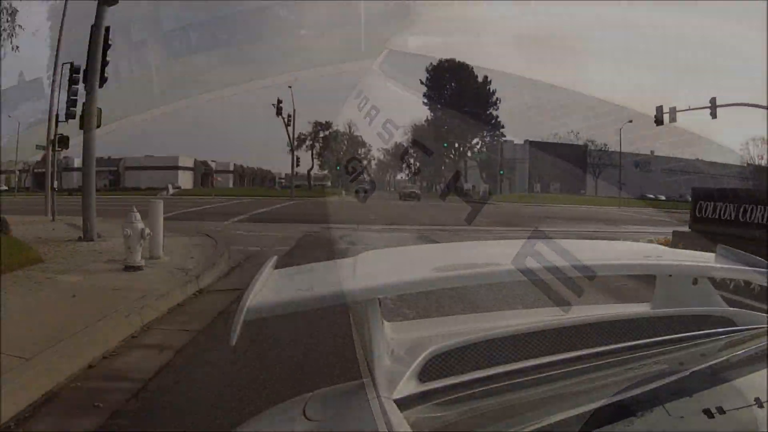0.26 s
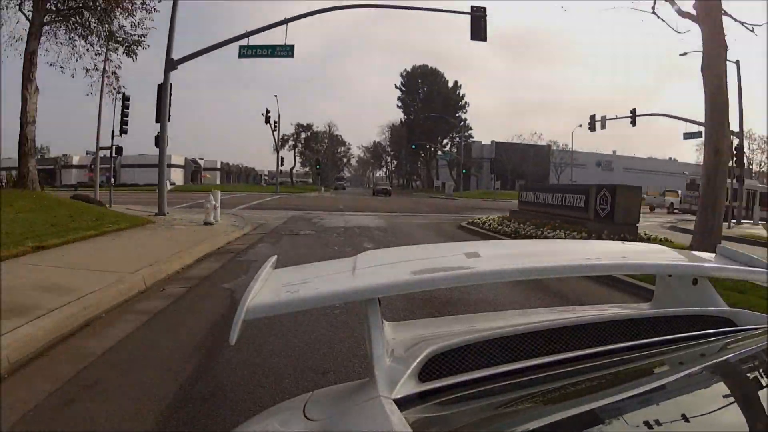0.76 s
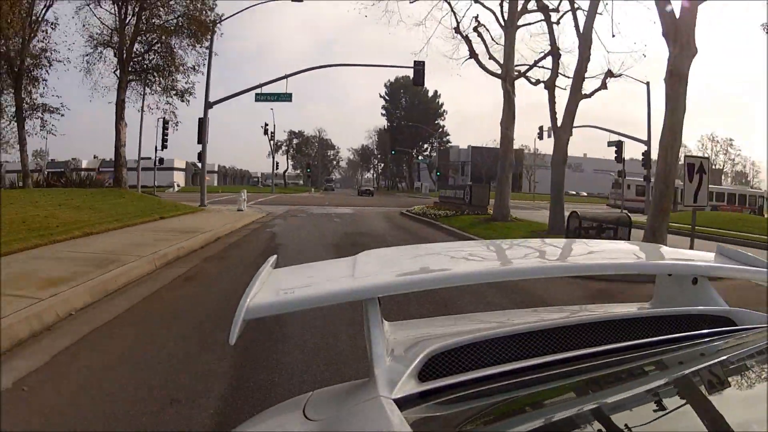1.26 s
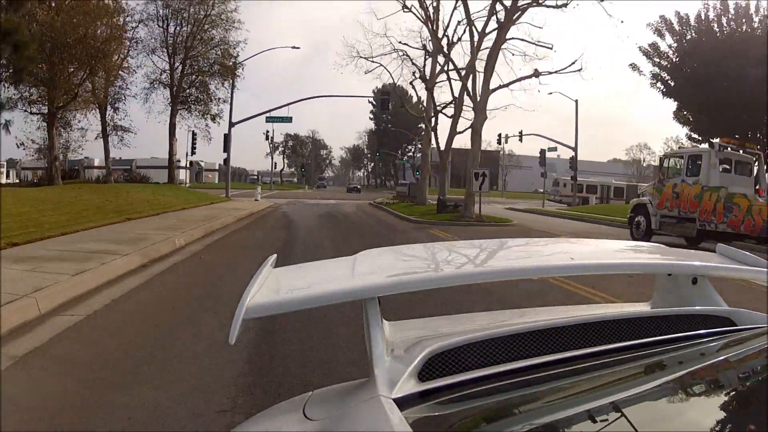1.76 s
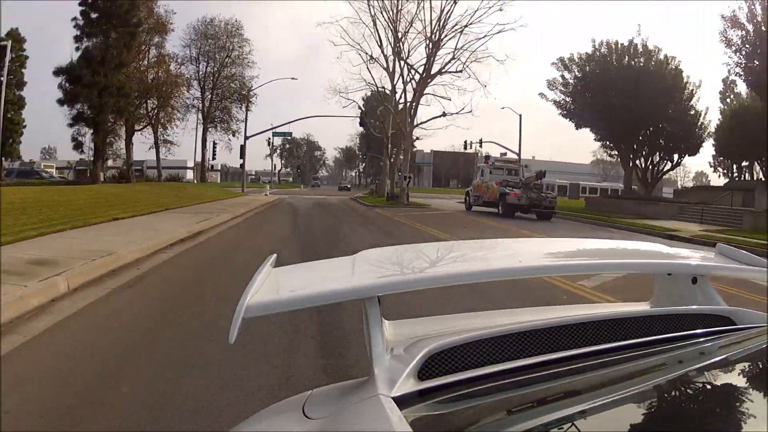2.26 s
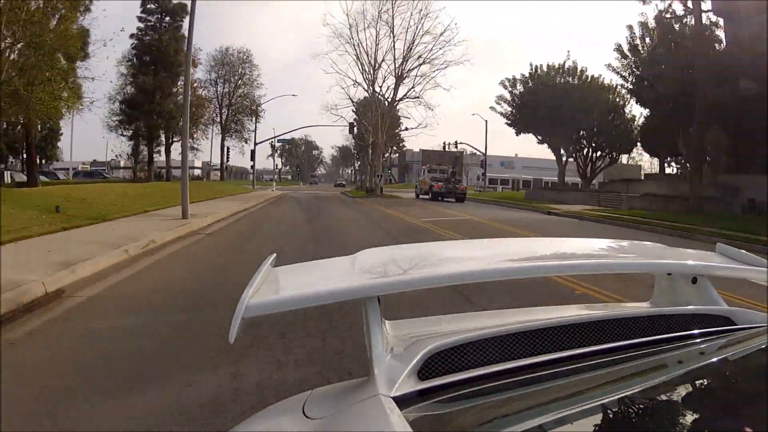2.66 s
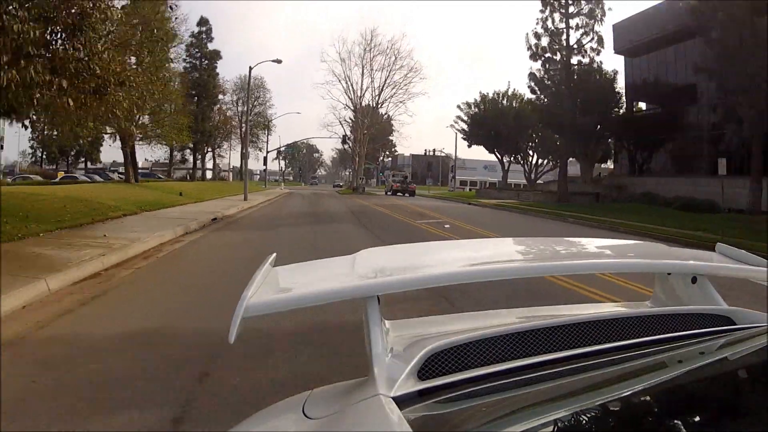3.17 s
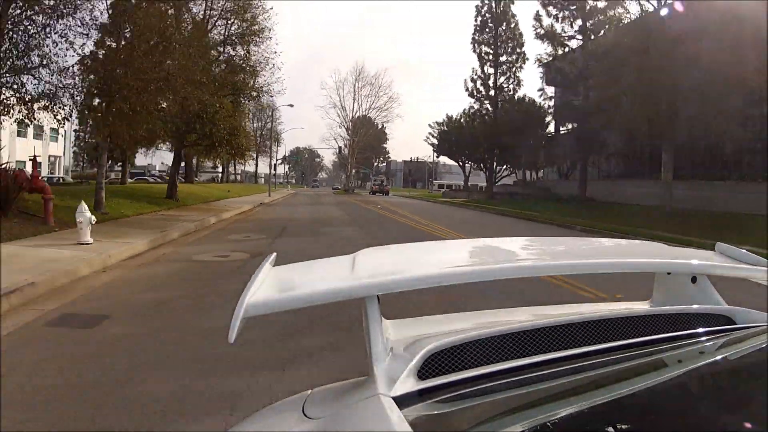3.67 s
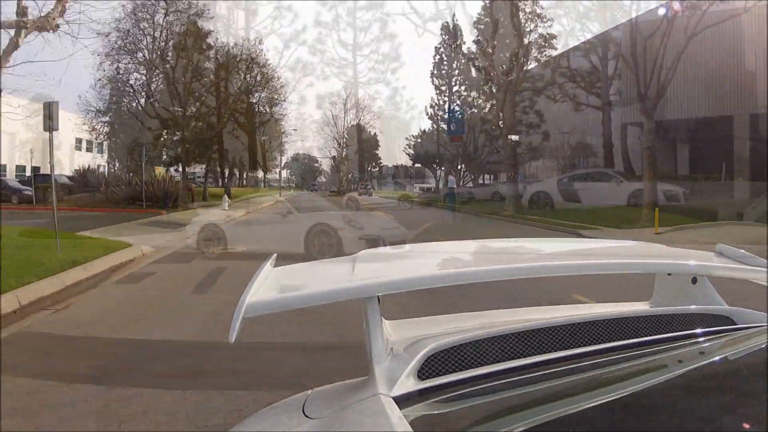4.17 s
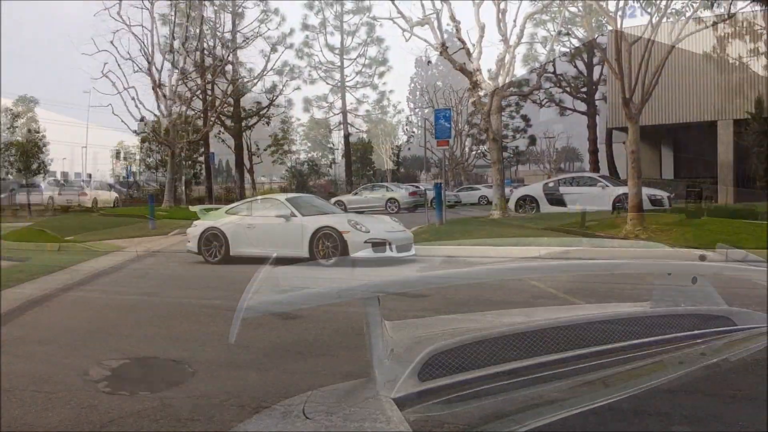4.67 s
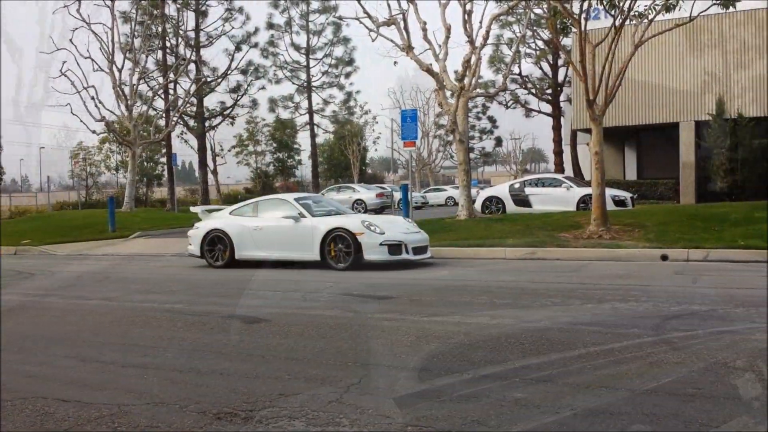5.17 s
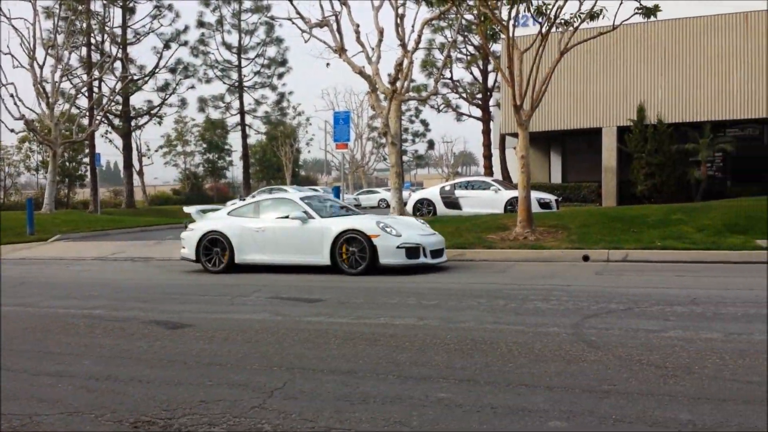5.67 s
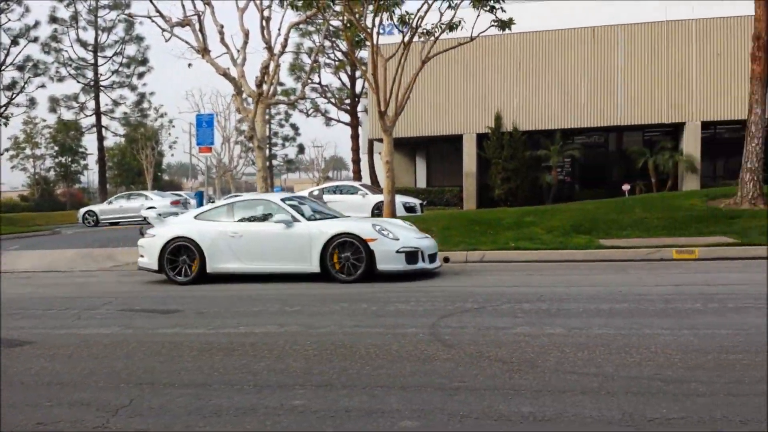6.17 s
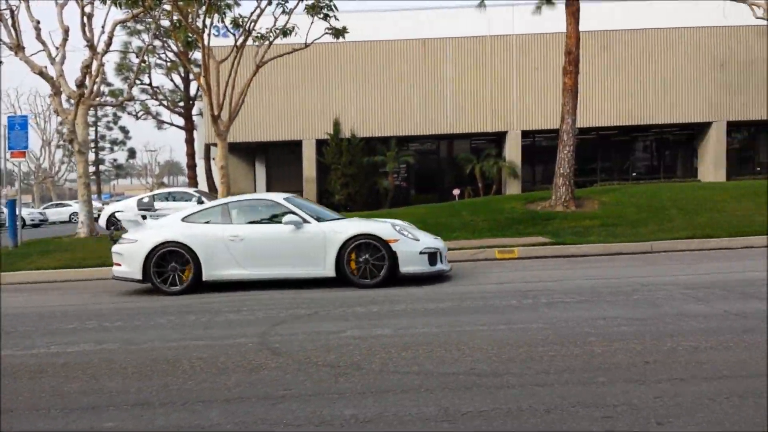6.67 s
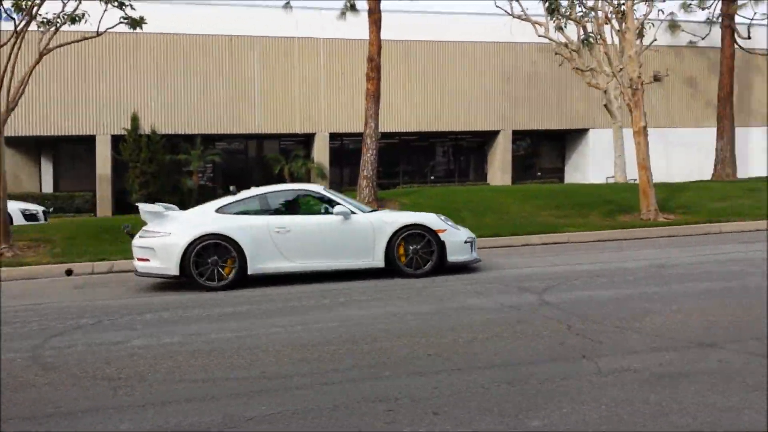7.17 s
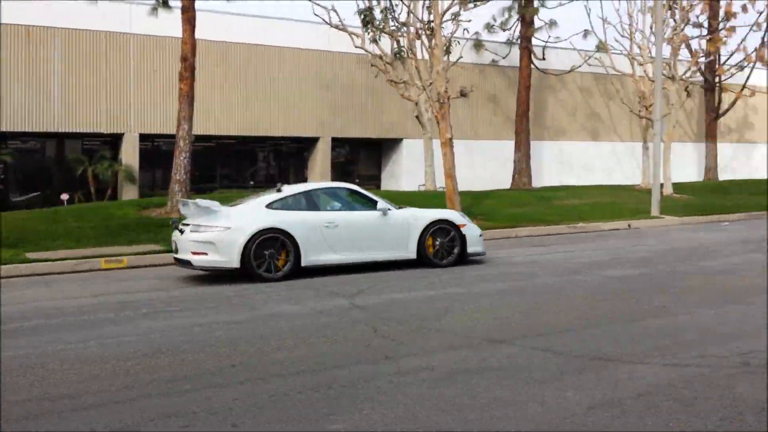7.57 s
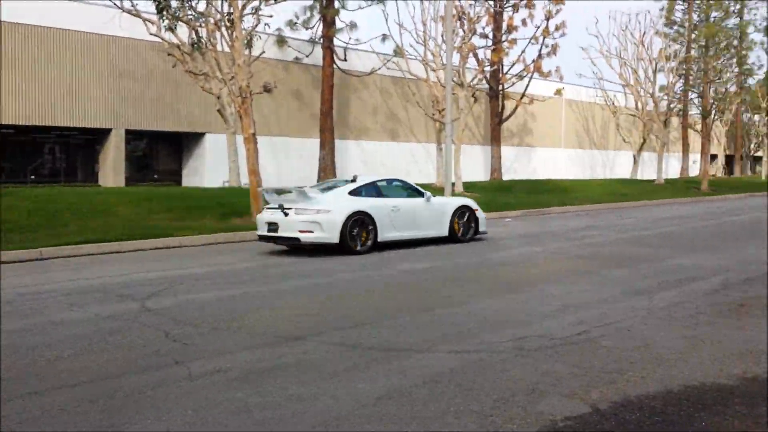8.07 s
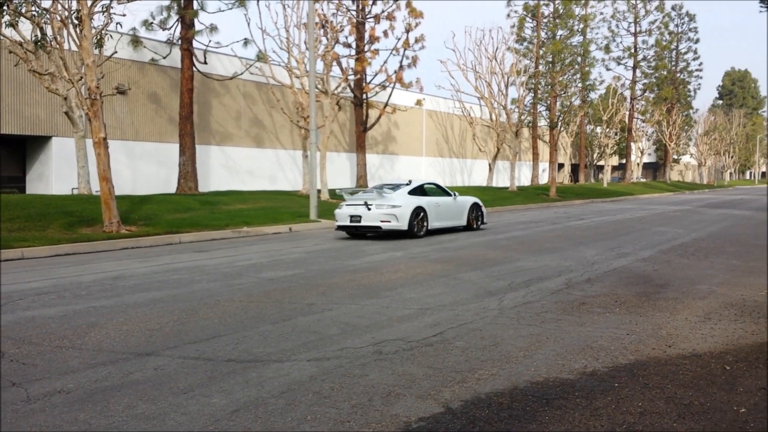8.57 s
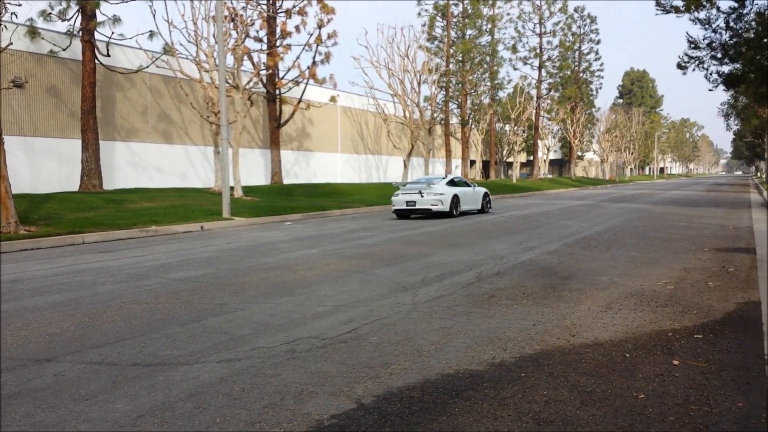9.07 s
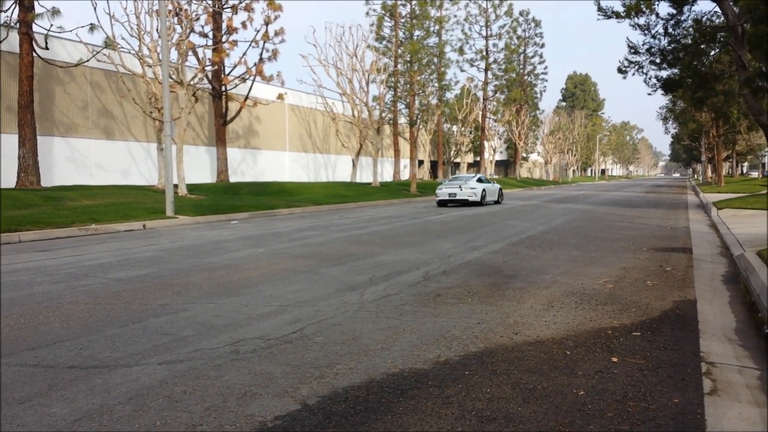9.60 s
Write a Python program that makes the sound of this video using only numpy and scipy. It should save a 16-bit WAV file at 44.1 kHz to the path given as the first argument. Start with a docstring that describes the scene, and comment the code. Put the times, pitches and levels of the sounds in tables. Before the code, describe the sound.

A sports car's loud exhaust drone accelerates through two upshifts in buffeting wind, then the car hisses past the kerb and shifts with a crackle.

```python
"""An exhaust drone and buffeting wind come first, at a small mono camera on the rear deck of a flat-six sports car.
It accelerates hard through two upshifts, the second with pops, through a gritty recorder with 8000 samples a second.
This dissolves to a pair of microphone ports at the kerb: the car hisses past, booms and shifts up with a crackle.
Engine tones are cosines locked to a crank phase; gas, wind and tyres are coloured noise; blows are decaying rings.
Behind the car at the kerb lie a thin scattered tail and a low rumble of far traffic."""
import sys
import numpy as np
from scipy import signal
from scipy.fft import rfft, irfft
from scipy.io import wavfile
from scipy.ndimage import uniform_filter1d, map_coordinates

SR = 44100
rng = np.random.default_rng(int(sys.argv[2]) if len(sys.argv) > 2 else 0)


def wav_out(sig):
    """Save sig, one row per channel (or a flat mono array), as 16-bit PCM at SR to the path in sys.argv[1]."""
    wavfile.write(sys.argv[1], SR, np.round(np.clip(np.atleast_2d(sig).T, -1, 1) * 32767).astype(np.int16))


N = 433944
T = np.arange(N) / SR  # seconds
FREQS = np.fft.rfftfreq(N, 1 / SR)  # Hz


# Engine speed on the deck, a long pull between two upshifts. Each row: time in seconds, firing rate in Hz.
DECK_REVS = [(0, 219), (.1, 229), (.26, 217.9), (.29, 163.1), (.45, 170.3), (1.1, 212.8), (1.55, 243.3),
             (2, 277.8), (2.3, 299.9), (2.6, 322), (3.05, 361), (3.3, 377), (3.6, 398.5), (3.8, 422),
             (3.9, 300), (4.3, 299.5), (5.3, 274.4)]
# Exhaust right under the camera, loud under throttle and sinking once the driver lifts.
# Each row: time in seconds, then relative levels of drone, rasp and gas hiss in dB.
DECK_LEVELS = [(0, -24, -47, -54), (.1, -16.5, -38.5, -52), (.3, -14.5, -47, -54.5), (.48, -10.5, -37, -49),
               (1, -7, -31.5, -47.5), (1.55, -8, -35, -46.5), (2.44, -2.5, -36, -45),
               (2.62, -3.5, -28.5, -37), (3.25, -4, -38.5, -39), (3.6, -9.5, -29, -35),
               (3.8, -14, -33.5, -36.5), (3.93, -5, -38.5, -46.5), (4.15, -8, -45.5, -47),
               (4.4, -19.5, -80, -51.5), (4.85, -23.5, -77, -55), (5.3, -31.5, -58, -60)]
# Brief dips of the drone. Each row: centre in seconds, length in seconds, depth in dB.
DECK_DIPS = [(.23, 0.13, 17), (3.84, 0.12, 0.5)]
# Pipe resonances and hollows that the firing harmonics sweep through. Each row: frequency in Hz, gain in dB.
DECK_PIPE = [(160, 1), (200, -1.5), (243, 3.5), (305, -4), (319, -16), (336, -6), (365, -5), (460, -3.5),
             (520, -8), (600, -18.5), (680, -17), (740, -15.5), (790, -4), (860, -17), (1250, -19.5)]
# Weaker lines from unequal cylinders: one list of cycles per two crank turns, one of relative levels in dB.
DECK_ORDERS = np.array([7, 8, 9, 10, 11, 14, 15, 16, 20, 21, 24, 27, 30, 36, 42])
DECK_ORDER_DB = [-24, 7.5, 6.5, 3.5, -6.5, -1, 0.5, -1.5, -7, -1.5, 3, -8, -3.5, -8.5, -11.5]
# Colour of those lines. Each row: frequency in Hz, gain in dB.
DECK_LINES = [(200, -2), (500, 1), (850, -2), (1100, -8), (1300, -8), (1600, 5), (2200, -9), (3300, 1.5)]
# Colour of the gas noise on the deck. Each row: frequency in Hz, gain in dB.
DECK_GAS = [(100, 3), (300, 25.5), (500, 11), (850, 5), (1400, 0.5), (2000, 0.5), (2600, -1), (3300, -5),
            (4000, -12.5)]
SECOND_DB, THIRD_DB = 2, -0.5  # overtones against the mean of drone and rasp


def deck_exhaust():
    """The tailpipes from just above: a firing tone, side lines from unequal cylinders, gas pulsing once a firing."""
    hz, = curves(DECK_REVS)
    load_db, rasp_db, gas_db = curves(DECK_LEVELS)
    drone_db = load_db - dips(DECK_DIPS)
    phase = crank(hz, wobble=0.0021)
    drone = undb(drone_db + swept(DECK_PIPE, hz) + 0.72 * walk(33)) * np.cos(phase)

    edge_db = (drone_db + rasp_db) / 2
    overtones = 0
    for k, db in ((2, SECOND_DB), (3, THIRD_DB)):
        flutter_db = 2 * walk(20) + 5.4 * walk(6.9)
        level_db = edge_db + db + swept(DECK_PIPE, k * hz) + flutter_db
        overtones = overtones + undb(level_db) * np.cos(k * phase)

    # each side line swells and sinks by chance
    lines = 0
    for order, db in zip(DECK_ORDERS, DECK_ORDER_DB):
        lines = lines + order_line(phase, order, db + 2 * walk(7.2) + 2 * walk(21))
    rasp = undb(rasp_db - 5.5) * tint(lines, DECK_LINES)

    pulsing = noise() * (1 + 0.15 * np.cos(phase))
    gas = undb(gas_db + 15) * unit(tint(pulsing, DECK_GAS))
    return drone + overtones + rasp + gas


# Air flow over the camera. Each row: time in seconds, relative buffet level in dB.
WIND = [(0, -23), (.45, -24), (.6, -25.5), (1.4, -26.5), (2.1, -26), (2.7, -24), (3.3, -29), (3.7, -23),
        (4.05, -30.5), (4.3, -26.5), (4.8, -23), (5.3, -31.5)]
# Gusts that swell out of the flow. Each row: centre in seconds, length in seconds, relative buffet level in dB.
GUSTS = [(0.663, 0.052, -22), (0.883, 0.083, -18.5), (1.08, 0.032, -20), (1.151, 0.031, -16),
         (1.375, 0.12, -19), (1.68, 0.044, -29), (1.927, 0.038, -14), (2.39, 0.034, -28),
         (2.472, 0.037, -19.5), (3.6, 0.047, -18.5), (3.82, 0.066, -19), (4.19, 0.022, -16),
         (4.347, 0.096, -18.5), (4.49, 0.15, -18.5), (4.949, 0.048, -18.5)]
# Colour of the buffeting at the housing. Each row: frequency in Hz, gain in dB.
BUFFET = [(20, -14.5), (45, -9), (90, -1.5), (160, -1.5), (260, -7.5), (400, -16.5), (600, -26.5),
          (1200, -46), (3500, -72)]
# Gusts that slap the camera. Each row: start in seconds, then relative levels of ring and crack in dB.
SLAPS = [(1.07, -21, -30.5), (4.19, -2.5, -49), (4.236, 3, -33), (4.317, 0, -36), (4.346, 2, -36),
         (4.514, 3.5, -33), (4.652, -2, -34.5), (4.733, 1, -42), (4.951, -8, -39)]
TURBULENCE_DB, TURBULENCE_RATE = 3.45, 12  # smaller eddies: depth, changes a second


def deck_wind():
    """Eddies buffet the camera housing and swell in gusts; short ringing slaps land on it."""
    flow = undb(curves(WIND)[0] + TURBULENCE_DB * walk(TURBULENCE_RATE))
    gusts = sum(undb(db) * bell(s, length) for s, length, db in GUSTS)
    strength = undb(3.0) * np.hypot(flow, gusts)
    buffet = strength * steady(tint(noise(), BUFFET), 0.038)
    slaps = bangs(SLAPS, ring_hz=153, ring_s=0.0027, ring_db=2, crack_s=0.0026, crack_db=17, crack_hz=1440)
    return buffet + slaps


HOLD_HZ = 8000  # samples a second in the camera


def sample_and_hold(x):
    """A recorder that holds each of its samples mirrors the sound around 8 and 16 kHz."""
    x = signal.sosfilt(signal.butter(7, 3500, fs=SR, output="sos"), x)
    clock = 2 * np.pi * HOLD_HZ * T
    mirrored = x * (1 + 2 * np.cos(clock) + 2 * np.cos(2 * clock))
    # holding each sample dulls the top as a sinc
    return irfft(rfft(mirrored) * np.sinc(FREQS / HOLD_HZ), N)


# Exhaust pops at the second upshift. Each row: start in seconds, then relative levels of ring and crack in dB.
DECK_POPS = [(3.813, 2, -19), (3.82, 6.5, -21), (3.831, 4.5, -32), (3.842, 3, -27), (3.852, 3.5, -25),
             (3.863, -21, -33), (3.888, 3, -47)]
# The camera mount rattles as the car rolls onto the road.
# Each row: start in seconds, then relative levels of ring and crack in dB.
RATTLES = [(0.062, -15, -50), (0.108, -18, -53), (0.118, -12, -34.5), (0.125, -9, -35), (0.196, -11, -38),
           (0.237, -19, -45), (0.271, -19, -46), (0.316, -12, -36), (0.355, -33, -40), (0.367, -13, -39),
           (0.458, -9, -32.5)]
# The deck fades out. Each row: time in seconds, gain in dB.
DECK_FADE = [(4.85, 0), (5.3, -3), (5.5, -41)]


def on_board():
    """Exhaust, wind, rattles and upshift pops meet at the mono camera on the deck."""
    pops = bangs(DECK_POPS, ring_hz=230, ring_s=0.0034, ring_db=-1, crack_s=0.0036, crack_db=9.5, crack_hz=1560)
    rattles = bangs(RATTLES, ring_hz=690, ring_s=0.00054, ring_db=3.5,
                    crack_s=0.0014, crack_db=18.5, crack_hz=3080)
    heard = deck_exhaust() + deck_wind() + pops + rattles
    return sample_and_hold(heard) * undb(curves(DECK_FADE)[0])


# Resonances that the bank harmonics sweep through behind the car. Each row: frequency in Hz, gain in dB.
KERB_PIPE = [(65, -30.5), (82, -10), (100, -22), (122, -4.5), (142, -12), (162, -4), (185, -2), (212, 0),
             (250, 2), (270, -17), (305, -14.5), (368, -1), (410, -3.5), (445, -19.5), (500, -27),
             (640, -21), (770, -19.5), (850, -11.5), (930, -25.5), (1060, -15)]
HARMONIC_COUNT, ROLLOFF_DB = 5, 1.17  # ROLLOFF_DB is the loss from each harmonic to the next
# the body of the car shades the higher harmonics until the pipes turn to the listener
TURN_S, TURN_LENGTH_S = 7.76, 0.051
SHADE_DB, SHADE_FROM_HZ, SHADE_FULL_HZ = 20, 253, 393
LAG_FROM_HZ, LAG_FULL_HZ = 370, 442  # above the upper pipe resonance a harmonic lags a quarter turn


def kerb_boom(hz, phase, boom_db):
    """Bank harmonics rise through the pipe resonances; higher ones flutter more and are shaded before the turn."""
    approaching = .5 - .5 * np.tanh((T - TURN_S) / TURN_LENGTH_S)
    boom = 0
    for k in range(1, HARMONIC_COUNT + 1):
        shade_db = SHADE_DB * approaching * np.interp(k * hz, [SHADE_FROM_HZ, SHADE_FULL_HZ], [0, 1])
        # the flutter calms once the pipes face the listener
        flutter_db = np.sqrt(k) * (.4 + .6 * approaching) * (walk(41) + walk(7))
        db = boom_db + swept(KERB_PIPE, k * hz) - ROLLOFF_DB * (k - 1) - shade_db + flutter_db
        lag = np.interp(k * hz, [LAG_FROM_HZ, LAG_FULL_HZ], [0, np.pi / 2])
        boom = boom - undb(db) * np.cos(k * phase - lag)
    return boom


# Engine speed from the kerb, pulling away to one upshift.
# Each row: time in seconds, firing rate of one cylinder bank in Hz. Also drives the throb in rush().
PASS_REVS = [(4.5, 74.3), (5.2, 64.4), (5.7, 74.5), (6.05, 82.8), (6.25, 90.5), (6.4, 92.5), (6.55, 101.5),
             (6.7, 106.5), (7.12, 129.5), (7.48, 152.3), (7.95, 182.5), (8.2, 197.5), (8.32, 208),
             (8.46, 212), (8.64, 222), (8.75, 155.7), (8.88, 155.5), (9.82, 197.5)]
# Exhaust from the kerb, following throttle and distance.
# Each row: time in seconds, then relative levels of boom and rasp in dB.
PASS_LEVELS = [(4.5, -13, -52.5), (5.25, -18.5, -47), (5.55, -12.5, -42.5), (6, -14.5, -36),
               (6.6, -8, -36.5), (7, -17.5, -27.5), (7.25, -5.5, -27), (7.55, -3.5, -22),
               (7.9, -8.5, -25.5), (8.12, -7.5, -29), (8.2, -12.5, -24), (8.33, -3, -19.5),
               (8.62, -2.5, -20.5), (8.78, -5.5, -24), (9.4, -9, -28.5), (9.82, -8, -29)]
# Brief dips of the exhaust, as the tail goes by and at the upshift.
# Each row: centre in seconds, length in seconds, depth in dB.
PASS_DIPS = [(7.775, .025, 8), (8.69, .075, 17)]
# Colour of the snarling lines. Each row: frequency in Hz, gain in dB.
PIPE_LINES = [(150, 6.5), (300, -1.5), (500, -9), (750, 8.5), (1000, 1.5), (1400, -11), (1800, -17),
              (3000, -26)]
# Colour of the gas puffs. Each row: frequency in Hz, gain in dB.
PIPE_GAS = [(30, -42), (80, -21), (170, 11.5), (300, 11), (420, 10), (540, -7.5), (750, 2), (1000, 2),
            (1400, 3.5), (1800, -10.5), (2300, -8.5), (3200, -23.5), (4400, -24.5), (9000, -24),
            (13000, -48.5)]


def kerb_exhaust():
    """Each bank's pulses boom in low harmonics; the pipes rasp around them with uneven firings and gas."""
    hz, = curves(PASS_REVS)
    boom_db, rasp_db = curves(PASS_LEVELS)
    phase = crank(hz, wobble=0.0021)
    boom = kerb_boom(hz, phase, boom_db - dips(PASS_DIPS))

    # orders in sixths of the bank rate: whole multiples are strongest, halves and thirds come from unequal firings
    whole = range(36, 79, 6)
    halves = range(9, 70, 6)
    thirds = [k for k in range(8, 54, 2) if k % 6]
    lines = 0
    for orders, db in ((whole, 0), (halves, -2), (thirds, -9)):
        for order in orders:
            lines = lines + order_line(phase, order, db + 3 * walk(12.0))
    snarl = undb(-2.0) * unit(tint(lines, PIPE_LINES))

    # one short puff of gas a firing, with strength varying by chance
    puffs = np.exp(3 * np.cos(phase)) * undb(2 * walk(220))
    gas = undb(1) * unit(tint(noise() * puffs, PIPE_GAS))
    return boom + undb(rasp_db - dips(PASS_DIPS) / 2) * (snarl + gas)


# Intake and tyres going by. Each row: time in seconds, relative hiss level in dB.
RUSH = [(5.1, -53), (6.03, -43.5), (6.2, -37.5), (6.6, -36.5), (7.45, -27), (7.72, -31.5), (7.82, -52),
        (8.1, -47), (8.35, -41.5), (8.65, -52.5), (9.8, -52)]
# Colour of that hiss. Each row: frequency in Hz, gain in dB.
HISS = [(40, -16), (300, -10), (700, -8), (1300, 1), (2200, -1.5), (3200, -7), (4500, -9.5), (6000, -7),
        (6800, -8.5), (7800, 0.5), (8700, -10), (10000, -8), (12000, -17), (13800, -23), (15000, -42.5)]


def rush():
    """Intake and tyres hiss, throbbing a little with the engine, until the body of the car hides them."""
    phase = crank(curves(PASS_REVS)[0], wobble=0.0093)
    hiss = tint(noise() * (1 + 0.083 * np.cos(phase)), HISS)
    return undb(curves(RUSH)[0] + 1.5 + .5 * walk(25)) * unit(hiss)


# Exhaust pops at the kerb upshift. Each row: start in seconds, then relative levels of ring and crack in dB.
KERB_POPS = [(8.637, 0, -19), (8.652, -1, -19), (8.667, -3, -19), (8.683, -1, -22), (8.699, -1, -18),
             (8.723, -1, -16), (8.736, -4, -23)]
# The kerb fades in. Each row: time in seconds, gain in dB.
KERB_FADE = [(4, -25), (4.8, -6.5), (5.1, 0)]
# The left port hears the car later. Each row: time in seconds, lag in milliseconds.
LAG = [(5, .32), (7.3, 0.35), (8.3, 0.3), (9.8, 0.23)]
# Colour of the left port minus the right. Each row: frequency in Hz, difference in dB.
PORTS = [(100, 13), (200, -0.8), (380, 4), (700, -2.5), (1300, 2.5), (2400, -3.5), (4400, 3.5),
         (8000, -6.5), (14000, -16.5)]


def at_kerb():
    """The passing car reaches a pair of microphone ports that differ in delay and colour."""
    pops = bangs(KERB_POPS, ring_hz=270, ring_s=.005, ring_db=-1, crack_s=.0016, crack_db=16.5, crack_hz=2000)
    heard = (kerb_exhaust() + rush() + pops + town()) * undb(curves(KERB_FADE)[0])
    late = (T - curves(LAG)[0] / 1000) * SR  # read position in samples
    left = map_coordinates(heard, [late], order=3)
    pair = np.array([left, heard]) + street(heard, t60=.6, wet_db=-9)
    lean_db = response(PORTS) / 2
    return irfft(rfft(pair) * undb(np.array([lean_db, -lean_db])), N)


def street(x, t60, wet_db):
    """Warehouse fronts scatter a thin tail, different on each side and weak in the bass."""
    t = T[:SR]
    tails = rng.standard_normal((2, SR)) * undb(-60 * t / t60) * (t > .015)
    tails /= np.sqrt(np.sum(tails ** 2, axis=1, keepdims=True))
    x = tint(x, [(200, -16), (420, 2), (800, -8.0), (2000, 11.5), (10000, 10.0)])
    return undb(wet_db) * np.array([signal.fftconvolve(x, tail)[:N] for tail in tails])


# Colour of the distant town behind the kerb. Each row: frequency in Hz, gain in dB.
TOWN = [(20, -29.5), (60, -0.5), (120, -2), (300, -23), (1000, -21.5), (3000, -31), (12000, -53)]


def town():
    """Far traffic is a low, slowly swelling rumble of coloured noise."""
    return undb(-46.5 + 1.5 * walk(2)) * unit(tint(noise(), TOWN))


def bangs(table, ring_hz, ring_s, ring_db, crack_s, crack_db, crack_hz):
    """Each blow rings out in a few cycles and starts with a steep front and a little grit."""
    ring, crack = np.zeros((2, N))
    t = T[:SR // 10]
    for s, peak_db, sharp_db in table:
        i = slice(int(s * SR), int(s * SR) + len(t))
        ring[i] -= undb(peak_db + ring_db) * np.sin(2 * np.pi * ring_hz * t) * np.exp(-t / ring_s)
        front = np.sin(2 * np.pi * crack_hz / 3 * t) + .8 * rng.standard_normal(len(t))
        crack[i] += undb(sharp_db + crack_db) * front * np.exp(-t / crack_s)
    soft = signal.butter(2, min(crack_hz, SR / 3), fs=SR, output="sos")
    lean = signal.butter(2, ring_hz / 2, "high", fs=SR, output="sos")
    return signal.sosfilt(lean, ring + signal.sosfilt(soft, crack))


def crank(hz, wobble):
    """Phase of a slightly unsteady rotation, radians."""
    return 2 * np.pi * np.cumsum(hz * (1 + wobble * walk(50))) / SR


def order_line(phase, order, db):
    """One engine line from a pattern that repeats every six cycles of the phase."""
    return undb(db) * np.cos(order * phase / 6 + rng.uniform(0, 2 * np.pi))


def swept(points, hz):
    """dB that a gliding tone meets on its way through (Hz, dB) resonances."""
    at_hz, db = np.transpose(points)
    return np.interp(np.log(hz), np.log(at_hz), db)


def bell(s, length):
    """A smooth swell of height 1 around a moment."""
    return np.exp(-np.minimum((2 * (T - s) / length) ** 2, 50))


def dips(table):
    """Decibels lost in brief dips."""
    return sum(depth_db * bell(s, length) for s, length, depth_db in table)


def curves(table):
    """The columns of a timed table, one value a sample."""
    s, *columns = np.transpose(table)
    return [np.interp(T, s, c) for c in columns]


def response(points):
    """dB at every frequency, from (Hz, dB) points."""
    hz, db = np.transpose(points)
    return np.interp(np.log(FREQS + 1), np.log(hz), db)


def tint(x, points):
    """Give a sound the colour of (Hz, dB) points."""
    return irfft(rfft(x) * undb(response(points)), N)


def noise():
    """White noise."""
    return rng.standard_normal(N)


def walk(rate):
    """Smooth chance of spread 1, changing about rate times a second."""
    k = max(int(SR / rate), 2)
    once = uniform_filter1d(noise(), k, mode="wrap")
    return unit(uniform_filter1d(once, k, mode="wrap"))


def steady(x, seconds):
    """Even out the slow swells of a sound, leaving rms near 1."""
    return x / np.sqrt(uniform_filter1d(x ** 2, max(int(seconds * SR), 8)) + 1e-12)


def unit(x):
    """Scale to rms 1."""
    return x / np.sqrt(np.mean(x ** 2))


def undb(db):
    """Decibels to gain."""
    return 10 ** (np.asarray(db) / 20)


def scene():
    """The ride on the deck gives way to the view from the kerb."""
    return on_board() + at_kerb()


TOP_HZ = 15500


def record(dry):
    """The loudest peaks are rounded off and the top is cut."""
    rounded = dry / (1 + (dry / .95) ** 8) ** (1 / 8)
    return signal.sosfilt(signal.ellip(10, .1, 80, TOP_HZ, fs=SR, output="sos"), rounded)


dry = scene()
out = record(dry)
wav_out(out)
```